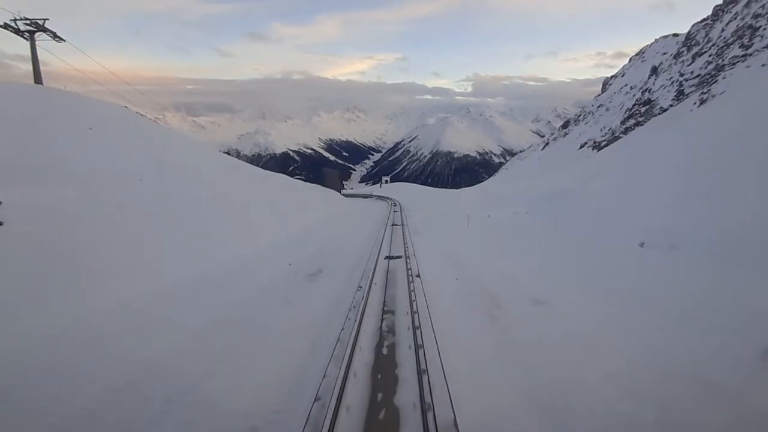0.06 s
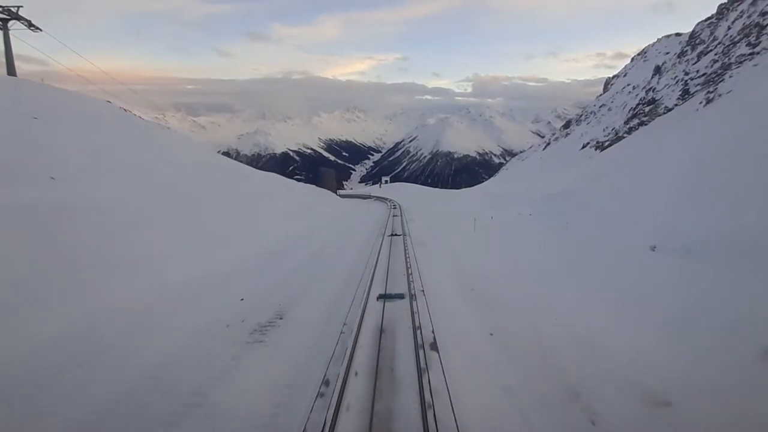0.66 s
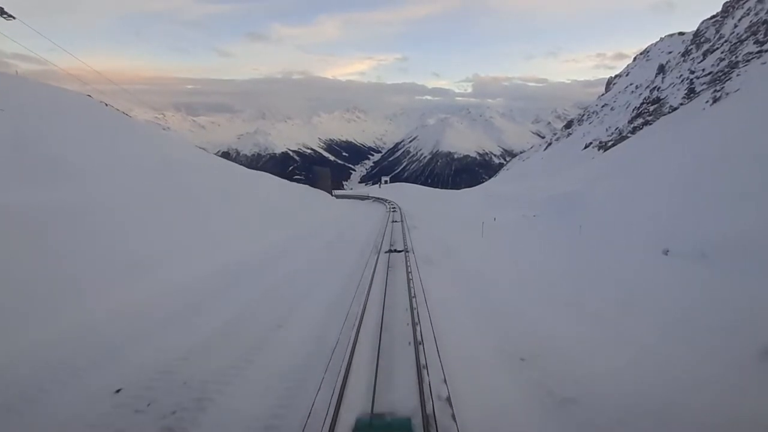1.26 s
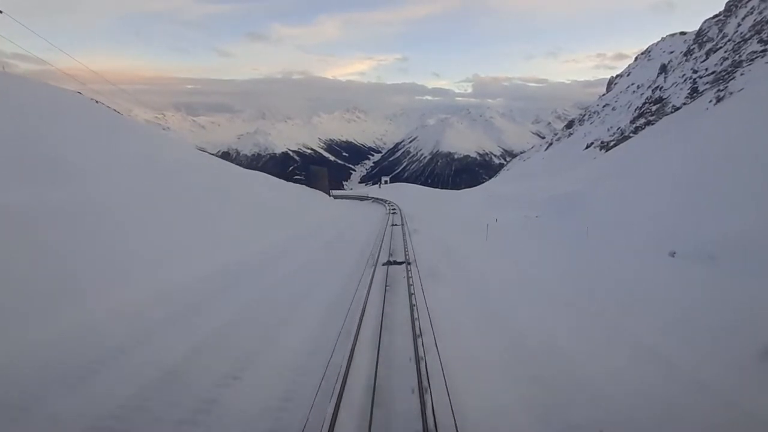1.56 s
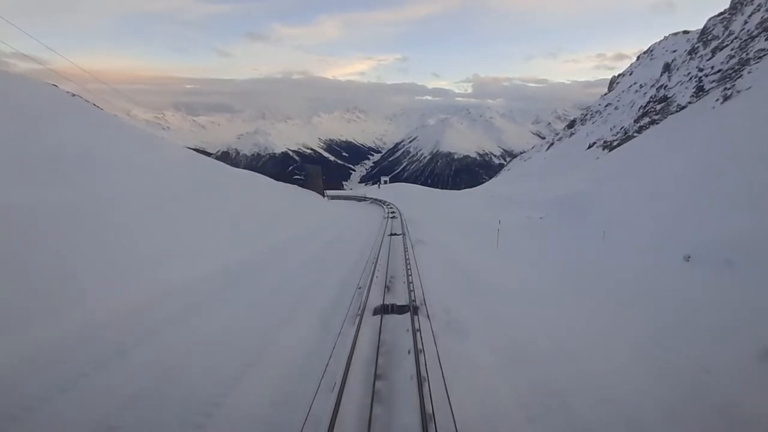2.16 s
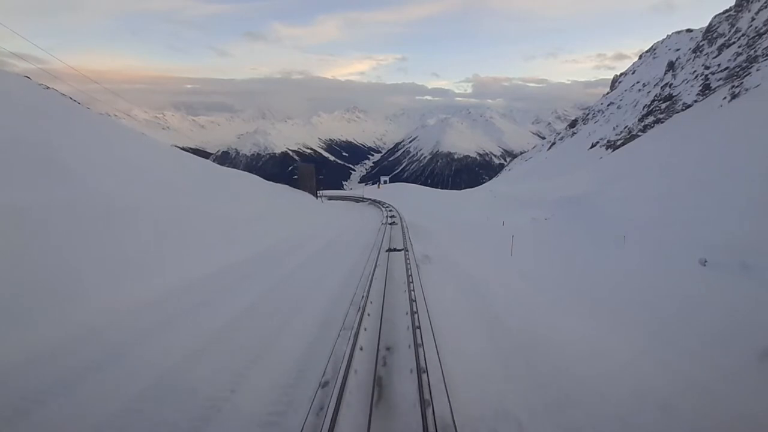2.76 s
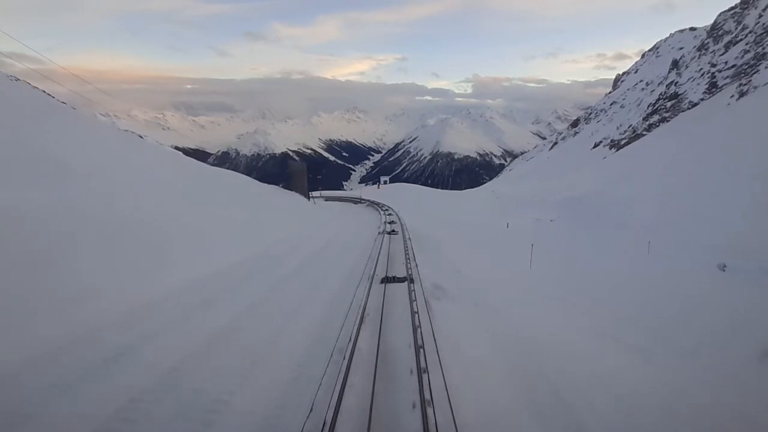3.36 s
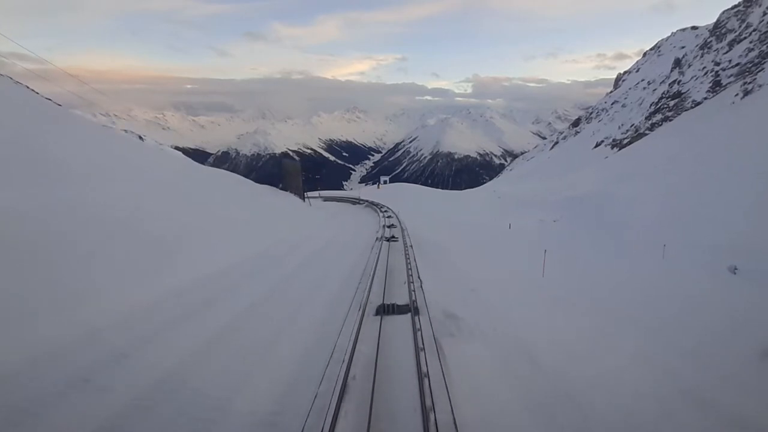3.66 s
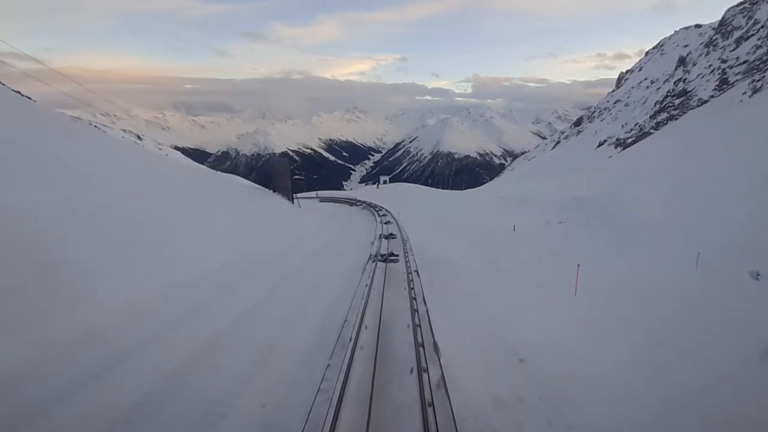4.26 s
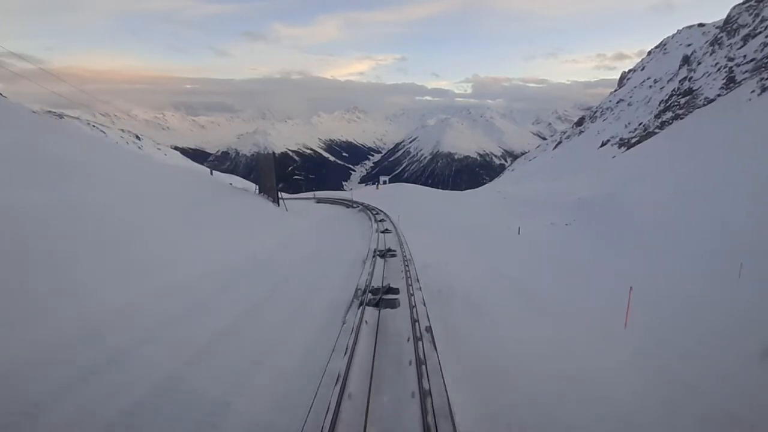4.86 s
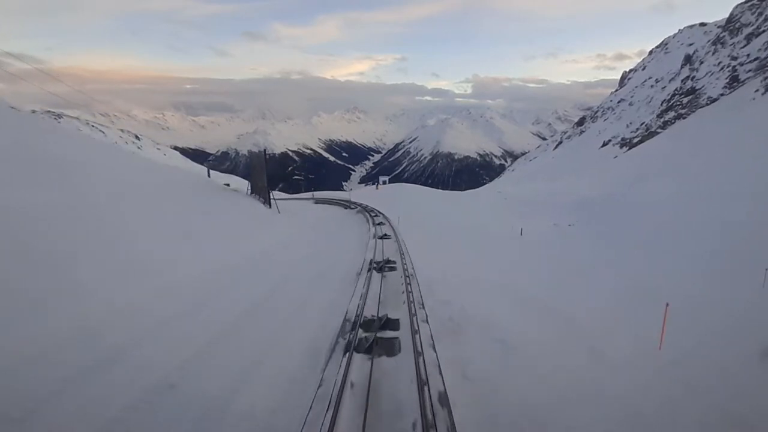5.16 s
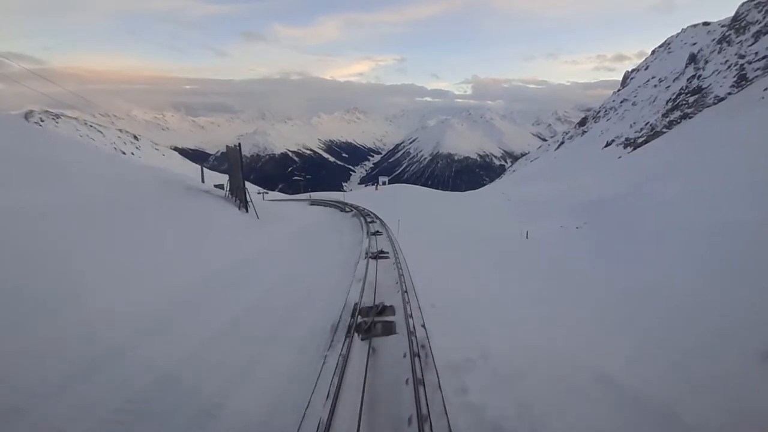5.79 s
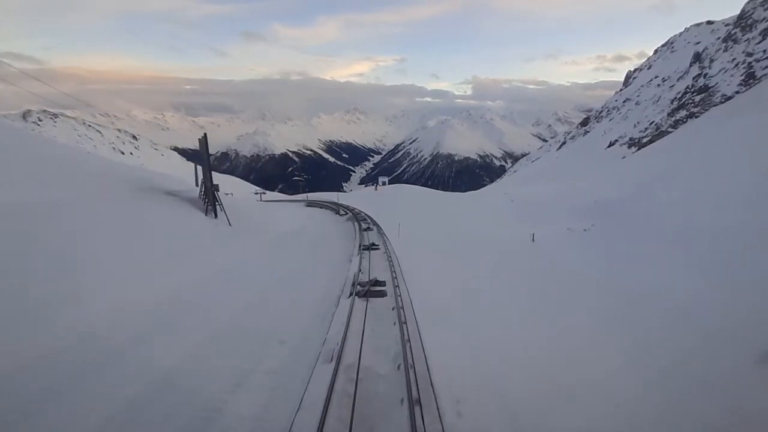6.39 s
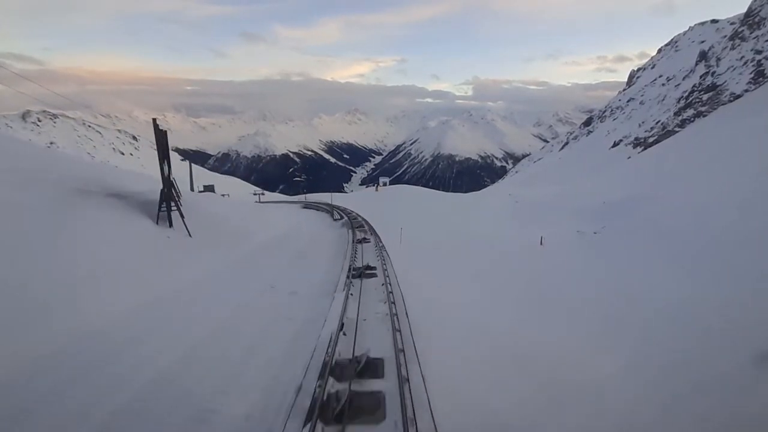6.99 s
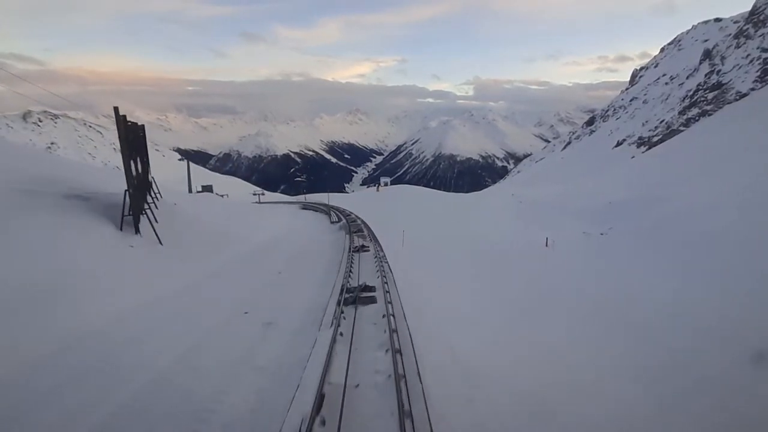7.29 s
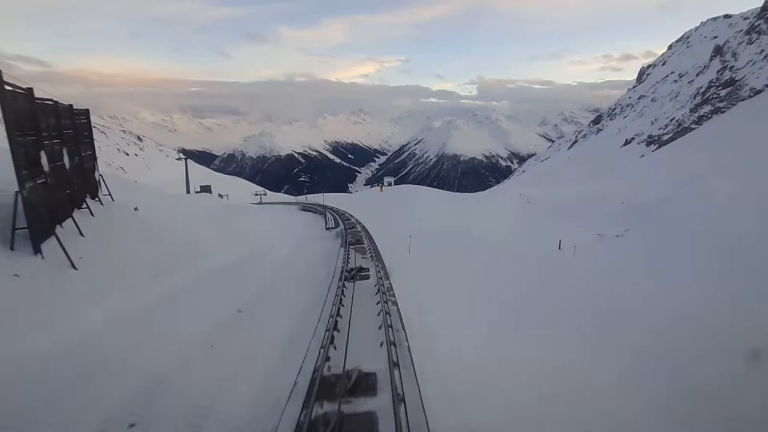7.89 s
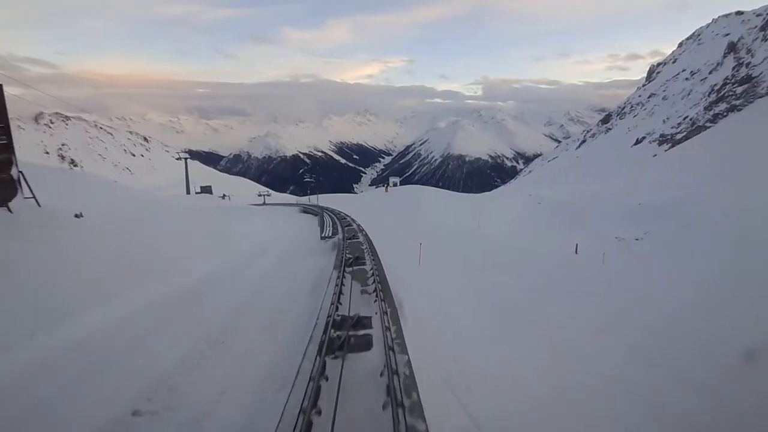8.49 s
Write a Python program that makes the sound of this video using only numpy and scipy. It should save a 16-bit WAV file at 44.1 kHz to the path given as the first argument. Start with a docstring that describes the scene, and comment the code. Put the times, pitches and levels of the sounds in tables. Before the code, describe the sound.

A funicular car rumbles and drones along its track, heard from inside, with thin wheel whine, scrapes and a few sharp snaps.

```python
"""A deep boom and drone fill the cabin of a funicular car running down a snowy track into a bend.
Rough rails shake the floor and wall panels, which surge at a rail joint about every second and a half.
Above them the steel wheels roar, hiss and whine, and their flanges (the lips that guide them) scrape.
A loose metal fitting jingles now and then, and something hard snaps right beside the microphone."""
import sys
import numpy as np
from scipy import signal
from scipy.fft import rfft, irfft, next_fast_len
from scipy.io import wavfile
from scipy.ndimage import uniform_filter1d

SR = 44100
rng = np.random.default_rng(int(sys.argv[2]) if len(sys.argv) > 2 else 0)


def generate_wav(signal):
    """Clip the signal to [-1, 1] and save it as 16-bit WAV at the path in sys.argv[1]."""
    frames = np.transpose(np.atleast_2d(signal))
    scaled = np.clip(frames, -1, 1) * 32767
    pcm = np.round(scaled).astype(np.int16)
    wavfile.write(sys.argv[1], SR, pcm)


N = 376613
TIME = np.arange(N) / SR
FFT_SIZE = 2 * next_fast_len(N // 2 + 1)
FREQS = np.maximum(np.fft.rfftfreq(FFT_SIZE, 1 / SR), 1)

# how alike the wheels sound left and right: pitch_hz, likeness (1 same, 0 unrelated, -1 opposite)
STEREO_LIKENESS = [(60, 0.96), (350, 0.67), (550, .57), (850, .3), (1320, -0.15), (2000, -0.16),
                   (3100, 0.047), (4000, -0.12), (7700, 0.15)]


def floor_boom():
    """The shaken floor and cabin air boom, louder at joints, at thumps and in the bend."""
    # their ringing notes: pitch_hz, width_hz, level_db, left_over_right_db
    notes = [(58.4, 10, -5.5, -3.5), (66.5, 3.4, -9, -1.5), (80, 3, -2.5, 0.5), (91.7, 2.9, -8, 4),
             (104.9, 5.8, 1.5, 5.5), (109.65, 2.3, -0.5, 5.5), (129, 7.1, -9.5, 1), (140, 9.2, -1.5, 0.5),
             (140.75, 5.5, -0.5, -1), (164.1, 14, -6, 2.5), (183.6, 8.3, -7.5, 4)]
    # thumps from the wheels and axles: time_s, boost_db
    thumps = [(.23, 4.5), (1.04, 3.5), (1.61, 4), (1.8, 6.5), (1.93, 4.5), (2.31, 3.5), (2.56, 3),
              (3.112, 3.5), (3.84, 3), (3.969, 2), (5.32, 5.5), (5.625, 8.5), (5.8, 3.5), (6.81, 4),
              (6.97, 5.5), (8.22, 4), (8.5, 1)]
    # brief dips in the boom: time_s, half_length_s, change_db
    lulls = [(0.488, 0.2, -5), (1.503, 0.079, -2), (1.997, .15, -1.5), (6.372, 0.023, -5.5),
             (7.688, 0.048, -5)]
    level_db = -19 + 2 * joint_jolts(half_s=.21) + 0.8 * bend()
    level_db += sum(db * bump(s, half_s=0.028) for s, db in thumps)
    level_db += sum(db * bump(s, half_s) for s, half_s, db in lulls)
    return from_db(level_db) * shaken(notes, band(53, 205, order=8), alike=0.94, steady_s=0.14)


def panel_drone():
    """The shaken wall panels drone, swelling at each joint just before the floor does."""
    # their ringing notes: pitch_hz, width_hz, level_db, left_over_right_db
    notes = [(213.7, 2, -6, 1), (231, 4.9, -2.5, 6), (259.3, 6.7, -10, 5.5), (273.3, 6.4, -1.5, 8),
             (285, 16, -1.5, 0), (306.95, 4.2, 2.5, -0.5), (314, 34, -5.5, -1.5), (332, 12, -7.5, -1),
             (345, 7, -5.5, -0.5), (396, 12, -11, 6.5)]
    # loudness between joints: time_s, level_db
    levels = [(0, -27.5), (.55, -30), (.8, -24.5), (1.55, -25.5), (2.9, -27.5), (3.55, -24.5), (4.05, -28),
              (4.85, -24), (6.35, -29.5), (6.8, -22.5), (7.45, -23), (8.5, -27)]
    level_db = over_time(levels) - 0.5 + 2 * joint_jolts(half_s=0.062, lead_s=0.12)
    return from_db(level_db) * shaken(notes, band(220, 430, order=6), alike=0.91, steady_s=0.75)


def rolling_roar():
    """Steel rolling on steel makes a dull roar that follows the roughness of the rail."""
    # low-to-high balance: pitch_hz, level_db
    colour = [(20, -12), (42, -6), (100, 4), (400, 6), (500, 2), (780, -4.5), (980, -7.5), (1250, -11),
              (1500, -13), (2100, -19.5), (2800, -31.5), (3700, -39.5), (8000, -57.5), (15000, -51)]
    # lean to the left: pitch_hz, left_over_right_db
    lean = [(40, -2), (200, 6), (550, 3), (1200, 4), (2100, 3), (4500, -1)]
    # rougher and smoother bits of rail: time_s, half_length_s, change_db
    patches = [(0.221, .12, 2), (.52, .11, -2), (.75, .08, 2), (2.02, .14, -3), (2.85, .11, -2),
               (3.246, .06, -0.5), (8.12, .08, 2.5), (8.45, .04, -4.5)]
    level_db = -33.5 + 0.5 * joint_jolts(half_s=0.23) + 0.5 * bend()
    level_db += sum(db * bump(s, half_s) for s, half_s, db in patches)
    gain = from_db(level_db) * flutter(13, depth_db=0.48)
    return gain * stereo_noise(from_db(over_hz(colour)) * pan(over_hz(lean)), over_hz(STEREO_LIKENESS))


def bend_growl():
    """The wheels and axles growl as the bend tightens, and clatter in short bursts."""
    # bands of the growl at full tightness: pitch_hz, width_hz, level_db
    bands = [(378, 50, -38.5), (470, 170, -40), (634, 170, -41), (1600, 390, -56)]
    # clatters: time_s, strength (1 = the growl at full tightness)
    clatters = [(6.992, 1.2), (7.022, 1.3), (8.335, 1.0), (8.368, 0.85)]
    alike = over_hz(STEREO_LIKENESS)
    clatter = sum(strength * bump(s, half_s=0.0072) for s, strength in clatters)
    growl = sum(from_db(db) * stereo_noise(resonance(hz, width), alike) for hz, width, db in bands)
    return (bend() + clatter) * pan(2.4) * growl


def wheel_whine(pitch_hz=847.4, width_hz=14, noise_share=.45):
    """The wheels on the left hold one thin note, part tone and part noise."""
    # loudness of the whine: time_s, level_db
    levels = [(0, -46.5), (.35, -45), (.5, -55), (.7, -52), (1.65, -50.5), (1.9, -54), (2.15, -49.5),
              (2.85, -52), (3.06, -41.5), (3.3, -51.5), (3.98, -45), (4.6, -49.5), (4.95, -54),
              (5.32, -44.5), (5.55, -52), (5.94, -45), (6.28, -56.5), (6.68, -47), (7.03, -45),
              (7.25, -49.5), (7.9, -53), (8.33, -46.5), (8.54, -47)]
    smooth = np.sqrt(1 - noise_share) * tone(pitch_hz, width_hz, TIME)[0]
    rough = np.sqrt(noise_share) * stereo_noise(resonance(pitch_hz, width_hz), alike=0.43)
    return from_db(over_time(levels)) * pan(6) * (smooth + rough)


def wheel_singing(swell_width_hz=17):
    """The wheels on the left ring at several notes; the bend muffles some and lifts others."""
    # their notes: pitch_hz, width_hz, level_db, change_at_full_tightness_db
    notes = [(795, 54, -2.5, 3.5), (1147, 54, -7, -5), (1225, 52, -8, 1), (1340, 46, -10.5, -7.5),
             (2050, 85, -15.5, -14.5), (2400, 50, -26, -3), (2645, 59, -24.5, -5.5), (2908, 25, -28.5, 5)]
    # single tones that swell and fade: time_s, half_length_s, pitch_hz, level_db
    swells = [(3.48, .12, 1358, -54), (3.76, .13, 2105, -58.5), (4.15, .045, 1137, -47),
              (4.37, .05, 1386, -52), (4.46, .05, 2080, -57), (4.58, .17, 1238, -54.5),
              (4.95, .06, 1374, -50), (5.68, .18, 788, -43.5), (7.024, .05, 782, -39.5)]
    tightness = bend()
    chord = sum(from_db(db + bend_db * tightness) * stereo_noise(resonance(hz, width), alike=0.43)
                for hz, width, db, bend_db in notes)
    tones = sum(from_db(db) * bump(s, half_s) * tone(hz, swell_width_hz, TIME)
                for s, half_s, hz, db in swells)
    return pan(7.1) * (from_db(-53) * flutter(2.6, depth_db=1.5) * chord + tones)


def flange_scrapes():
    """The flanges rub the rail in gritty strokes: heavy ones grind low, light ones sizzle."""
    # strokes: start_s, level_db, rise_s, decay_s, brightness_db
    scrapes = [(.15, -73, 0.095, .12, -0.5), (.75, -61.5, .05, 0.24, -3), (.965, -57, 0.037, 0.15, 0.5),
               (1.305, -66, 0.03, 0.036, -4), (1.53, -64.5, 0.022, 0.09, -9.5), (1.64, -67.5, .06, 0.1, 3),
               (2.405, -62, 0.023, 0.16, -7.5), (2.93, -66.5, .08, 0.18, -5),
               (3.31, -66.5, .025, 0.083, -7.5), (3.41, -70, .03, .13, -4), (3.92, -69.5, .06, 0.21, 1.5),
               (5.06, -69.5, .03, 0.1, 4.5), (5.257, -60.5, .008, 0.023, -3), (5.29, -69, .02, .1, 0),
               (5.455, -58, .015, 0.074, 1), (5.527, -59.5, .0091, .03, 2), (5.625, -62, 0.016, 0.04, 2),
               (5.77, -64, .038, 0.067, -8), (5.99, -59.5, .018, 0.094, 6.5),
               (6.225, -57, 0.035, 0.15, -0.5), (6.62, -62.5, 0.036, 0.083, 4.5),
               (6.8, -64, 0.048, .05, -9), (6.972, -57, 0.018, 0.074, -11.5), (7.13, -62, 0.037, 0.095, -3),
               (7.32, -61.5, .06, 0.2, -0.5), (7.88, -63.5, 0.13, 0.13, 0.5), (8.245, -61, 0.017, .05, -5),
               (8.32, -56.5, 0.026, 0.091, -7), (8.486, -55, .002, .4, 6)]
    # low-to-high balance: pitch_hz, level_db
    colour = [(300, -2.5), (700, 13.5), (1500, 14.5), (2700, 7), (3800, 0.5), (5200, 0), (6800, -6.5),
              (8200, -8), (10000, -8.5), (15000, -8)]
    grit = flutter(250, depth_db=1.5)
    rub = from_db(6.5) * grit * stereo_noise(from_db(over_hz(colour)), over_hz(STEREO_LIKENESS))
    grind = filtered(rub, band(0.89, 2100, order=4))
    sizzle = filtered(rub, band(10000, SR, order=4))
    swish = rub - grind - sizzle
    out = np.zeros((2, N))
    for s, db, rise_s, decay_s, bright_db in scrapes:
        at, envelope = stroke(s, rise_s, decay_s)
        scrape = from_db(-bright_db) * grind[:, at] + swish[:, at] + from_db(bright_db) * sizzle[:, at]
        out[:, at] += from_db(db) * envelope * scrape
    return out


def flange_bite(start_s=8.486):
    """A flange suddenly catches the rail and the wheel's rim rings harshly."""
    # the rim's notes: pitch_hz, width_hz, level_db
    notes = [(4200, 310, -59), (5060, 180, -65), (7750, 120, -68)]
    out = np.zeros((2, N))
    at, envelope = stroke(start_s, rise_s=.002, decay_s=.3)
    out[:, at] = envelope * sum(from_db(db) * tone(hz, width, TIME[at]) for hz, width, db in notes)
    return out


def snaps():
    """A hard part snaps and barely rings: bright on the near right side, a duller knock on the left."""
    # snaps: start_s, level_db
    hits = [(2.3453, 10), (2.3537, 10), (5.4432, 9.5)]
    # the part's notes: pitch_hz, width_hz, left_db, right_db
    notes = [(890, 195, 13, 4.5), (1890, 490, -11, -0.5), (2550, 370, -12, -5), (3700, 210, -34, -5.5),
             (4870, 490, -20, -7.5), (5620, 650, -25, -0.5), (6370, 350, -24, -7), (7780, 550, -11.5, -17),
             (12400, 3400, -21, -14.5)]
    clicks = np.zeros(N)
    for s, db in hits:
        clicks[round(s * SR)] = from_db(db)
    out = sum(from_db([[left], [right]]) * ring(clicks, hz, width) for hz, width, left, right in notes)
    out[0] = np.roll(out[0], 18)  # reaches the far left side 18 samples later
    return out


def loose_fitting(rise_s=0.0045, chatter_db=-8.5, blur_hz=48, middle_hz=4300):
    """A jolted metal fitting jingles: a short, rough chatter on top of its ringing notes."""
    # jingles: start_s, level_db, brightness_db_per_octave
    jingles = [(.688, -67, -2), (1.03, -49, 7), (1.046, -61, 1), (1.0914, -55.5, 9), (1.11, -62, 4),
               (1.13, -57, -5), (3.851, -57.5, -0.5), (5.717, -63, 2), (5.7304, -58, 0.5),
               (7.598, -64.5, -6.5), (8.4866, -70, 2)]
    # its notes: pitch_hz, level_db, ring_s (time to fade by 60 dB)
    notes = [(3200, 4, .11), (3675, -8.5, .08), (4250, -7, .08), (4540, -2, .12), (4770, -6.5, .08),
             (5130, -2.5, .12), (5130, -9.5, .1), (6600, -14, .06), (13780, -10.5, .04)]
    chatter = flutter(300, depth_db=2.0) * stereo_noise(resonance(4800, 3500), alike=0)
    out = np.zeros((2, N))
    for s, db, bright_db in jingles:
        at, envelope = stroke(s, rise_s, decay_s=.022)
        out[:, at] += from_db(db + chatter_db) * envelope * chatter[:, at]
        for hz, note_db, ring_s in notes:
            at, envelope = stroke(s, rise_s, ring_s / np.log(1000))
            gain = from_db(db + note_db + bright_db * np.log2(hz / middle_hz))
            out[:, at] += gain * envelope * tone(hz, blur_hz, TIME[at])
    return out


def rail_hiss():
    """The wheels brush the rail with a faint hiss that rises at joints and in the bend."""
    # low-to-high balance: pitch_hz, level_db
    colour = [(400, -8.5), (1500, 10), (2700, 7.5), (3800, 3.5), (5200, -2), (6800, -3.5), (8200, -11),
              (10000, -5), (15000, -4.5)]
    level_db = -73.5 + 4.5 * joint_jolts(half_s=0.3) + 9.5 * bend()
    gain = from_db(level_db) * flutter(11, depth_db=0.5)
    return gain * stereo_noise(from_db(over_hz(colour)), over_hz(STEREO_LIKENESS))


def joint_jolts(half_s, lead_s=0):
    """How hard the rail joints shake the car, swelling and fading around each one."""
    # joints: time_s, strength
    joints = [(1.011, 1.13), (2.452, 1.6), (3.881, 2), (5.479, 0.54), (6.929, 0.56), (8.42, 1.17)]
    return sum(strength * bump(s - lead_s, half_s) for s, strength in joints)


def bend():
    """How tightly the track curves at each moment."""
    # the curve: time_s, tightness (0 straight, 1 full)
    curve = [(5.0, 0.017), (6.5, 0.31), (7.0, 0.74), (8.5, 0.59)]
    return over_time(curve)


def shaken(notes, passband, alike, steady_s):
    """Rough rails keep a set of notes ringing, with the loudness evened out over steady_s."""
    power = sum(resonance(hz, width) / width * (from_db(db) * pan(lean)) ** 2
                for hz, width, db, lean in notes)
    ringing = stereo_noise(np.sqrt(power) * passband, alike)
    window = int(steady_s * SR)
    average_power = uniform_filter1d(uniform_filter1d(ringing.mean(axis=0) ** 2, window), window)
    return ringing / np.sqrt(average_power + 1e-9)


def stereo_noise(gain, alike):
    """Noise shaped by a gain per frequency; the average of its two sides has a typical size of 1."""
    shape = (2, len(FREQS))
    common, opposed = rng.standard_normal(shape) + 1j * rng.standard_normal(shape)
    alike = np.clip(alike, -.99, .99)
    spectrum = np.sqrt(1 + alike) * common + np.sqrt(1 - alike) * opposed * [[1], [-1]]
    noise = irfft(gain * spectrum)[:, :N]
    return noise / np.sqrt(np.mean(noise.mean(axis=0) ** 2) + 1e-20)


def tone(hz, width_hz, t):
    """A stereo tone that wanders at random, blurring its pitch over width_hz."""
    wander = np.cumsum(rng.standard_normal((2, len(t))), axis=1) * np.sqrt(2 * np.pi * width_hz / SR)
    return np.sqrt(2) * np.sin(2 * np.pi * hz * t + uniform_filter1d(wander, size=24))


def flutter(rate_hz, depth_db):
    """A gain that wavers at random, up to about rate_hz."""
    return from_db(depth_db * stereo_noise(1 / (1 + (FREQS / rate_hz) ** 4), alike=1).mean(axis=0))


def bump(s, half_s):
    """A smooth swell of height 1 around the moment s."""
    return np.exp(-((TIME - s) / half_s) ** 2)


def stroke(s, rise_s, decay_s):
    """The second after the moment s, and a loudness curve for it that rises and dies away."""
    at = slice(int(s * SR), int(s * SR) + SR)
    age = TIME[at] - TIME[at][0]
    return at, np.minimum(age / rise_s, 1) * np.exp(-np.maximum(age - rise_s, 0) / decay_s)


def ring(x, hz, width_hz):
    """Let x set one note ringing; a narrower note rings longer."""
    r = np.exp(-np.pi * width_hz / SR)
    feedback = [1, -2 * r * np.cos(2 * np.pi * hz / SR), r * r]
    return signal.lfilter(np.array([1, 0, -1]) * (1 - r * r) / 2, feedback, x + 1e-18)


def resonance(hz, width_hz):
    """Power of one ringing note at each frequency, 1 at its peak."""
    return 1 / (1 + ((FREQS ** 2 - hz ** 2) / (FREQS * width_hz)) ** 2)


def band(low_hz, high_hz, order):
    """Gains that keep one range of frequencies; a higher order makes its edges steeper."""
    return 1 / np.sqrt((1 + (low_hz / FREQS) ** (2 * order)) * (1 + (FREQS / high_hz) ** (2 * order)))


def filtered(x, gain):
    """Apply a gain per frequency to a stereo sound."""
    return irfft(rfft(x, FFT_SIZE) * gain)[:, :N]


def over_time(points):
    """Join (time_s, value) points with straight lines."""
    return np.interp(TIME, *np.transpose(points))


def over_hz(points):
    """Join (pitch_hz, value) points, giving each octave equal room."""
    hz, value = np.transpose(points)
    return np.interp(np.log(FREQS), np.log(hz), value)


def pan(left_db):
    """Two gains that make the left side left_db louder than the right."""
    return from_db(np.array([[.5], [-.5]]) * left_db)


def from_db(db):
    """Turn decibels into a gain, the number a sound is multiplied by."""
    return 10 ** (np.asarray(db) / 20)


def scene():
    """Everything as it meets inside the cabin."""
    cabin = floor_boom() + panel_drone()
    wheels = rolling_roar() + bend_growl() + rail_hiss() + wheel_whine() + wheel_singing()
    return cabin + wheels + flange_scrapes() + flange_bite() + snaps() + loose_fitting()


def record(dry, cutoff_hz=15400):
    """The microphone's opening dulls the treble, and the very top is cut off."""
    # its effect on the treble: pitch_hz, gain_db
    microphone = [(7300, 0.5), (8300, -6.5), (9000, -15), (9800, -9.5), (12500, -8), (15000, -12.5)]
    log_gain = np.log(from_db(over_hz(microphone)))
    mirrored = np.r_[log_gain, log_gain[-2:0:-1]]
    # a "minimum phase" filter, so that nothing sounds early
    response = np.exp(np.conj(signal.hilbert(mirrored)))[:len(FREQS)]
    fade_in = np.minimum(TIME / .004, 1)
    dulled = filtered(dry * fade_in, response)
    return signal.sosfilt(signal.butter(14, cutoff_hz, fs=SR, output="sos"), dulled)


dry = scene()
out = record(dry)
generate_wav(out)
```